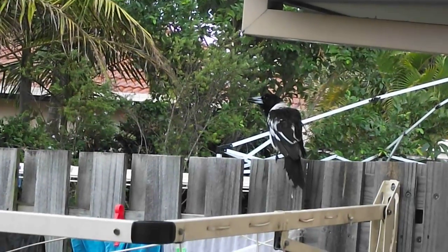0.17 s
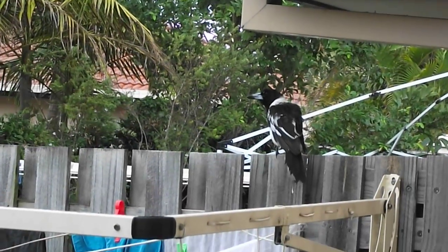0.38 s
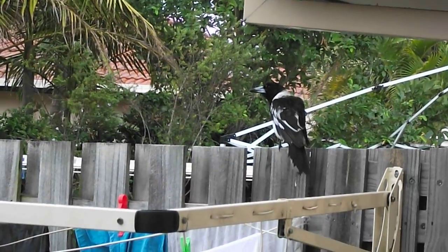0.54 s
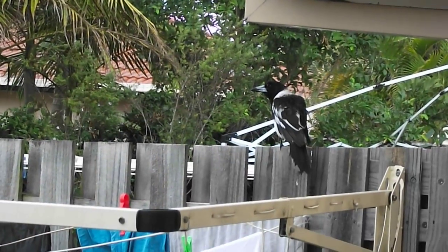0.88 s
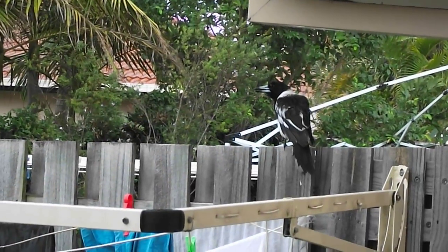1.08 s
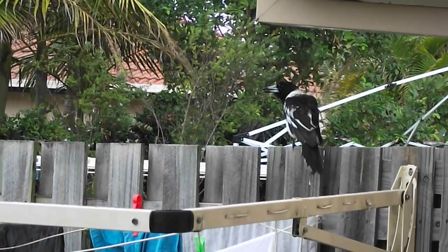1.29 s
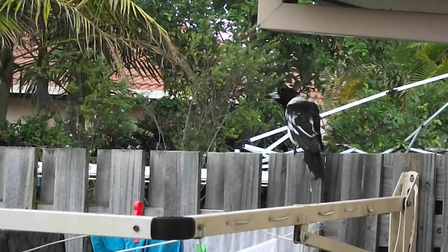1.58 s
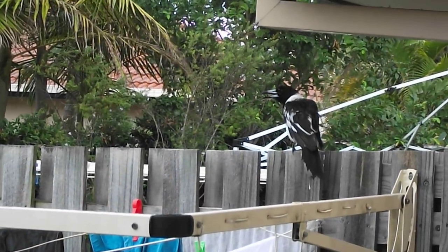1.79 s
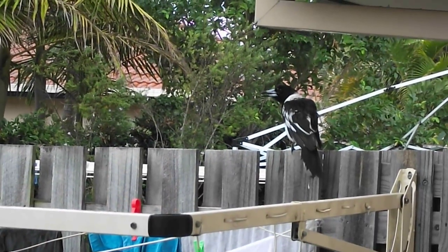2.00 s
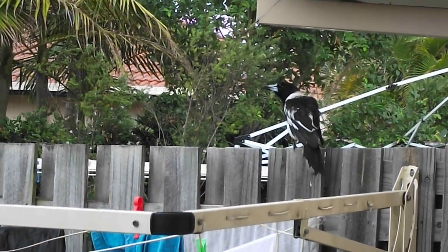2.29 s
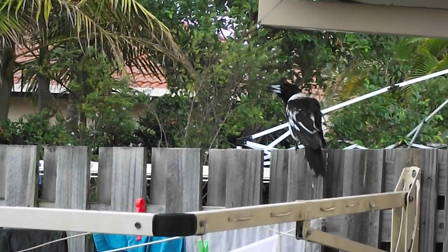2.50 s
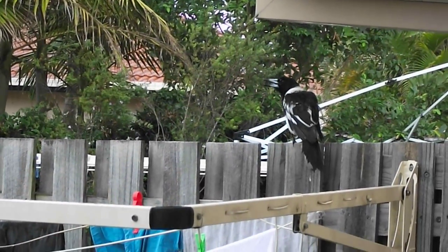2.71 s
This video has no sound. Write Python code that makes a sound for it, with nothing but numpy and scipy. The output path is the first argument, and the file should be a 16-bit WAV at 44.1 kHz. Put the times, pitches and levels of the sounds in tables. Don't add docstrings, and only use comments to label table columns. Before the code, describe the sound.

A bird sings a wavering low whistle, then pairs of higher chirpy calls over soft yard hiss

```python
import sys
import numpy as np
from scipy import signal
from scipy.io import wavfile
from scipy.ndimage import uniform_filter1d

SR = 44100
rng = np.random.default_rng(int(sys.argv[2]) if len(sys.argv) > 2 else 0)


def gain_from_db(level_db):
    decades = np.asarray(level_db, float) / 20
    return 10 ** decades


def master(y):
    cut = np.clip(np.atleast_2d(y).T, -1, 1)
    pcm = np.round(cut * 32767)
    wavfile.write(sys.argv[1], SR, pcm.astype(np.int16))


N = 125685


def evened(x):
    return x / np.sqrt(np.mean(x ** 2) + 1e-20)


def slow(count, hz):
    return evened(signal.lfilter(*signal.butter(2, hz, fs=SR), rng.standard_normal(count)))


def tone(hz, wobble_hz, wobble_rate_hz=4.1):
    cycles = np.cumsum(hz + wobble_hz * slow(N, wobble_rate_hz)) / SR
    return np.sqrt(2) * np.sin(2 * np.pi * (cycles + rng.random()))


def hiss(shape, patchy_db, low_hz, spectra):
    bin_hz = np.fft.rfftfreq(1024, 1 / SR)
    patches = uniform_filter1d(uniform_filter1d(spectra.real, size=12, axis=0), size=10, axis=1)
    shape_hz, shape_db = np.transpose(shape)
    colour = gain_from_db(np.interp(np.log(bin_hz + 1), np.log(shape_hz + 1), shape_db)) * (bin_hz > low_hz)
    shaped = spectra * colour[:, None] * gain_from_db(patchy_db * evened(patches))
    return evened(signal.istft(shaped, nperseg=1024, noverlap=768)[1][:N])


def yard_air():
    # (frequency [Hz], density [dB per Hz])
    middle_shape = [(12, -42), (20, 8), (58, -13), (93, -5.5), (120, -7.5), (367, -13.5), (873, -18),
                    (3530, -27), (16000, -51.5)]
    wide_shape = [(300, -7), (1800, -29), (2600, -9), (5000, 0), (7300, -13), (12000, -11.5), (15800, -9.5)]
    a, b = rng.standard_normal((N // 256 + 5, 513, 2)).T
    spectra = a + 1j * b
    middle = gain_from_db(-41.5) * hiss(middle_shape, 0.51, 12, spectra)
    wide = gain_from_db(-59.5) * hiss(wide_shape, 1.2, 400, -1j * spectra)
    return middle, wide


def machines(t):
    # (time [s], frequency [Hz], level [dB])
    drone = [(0, 87.4, -46), (.5, 87.54, -44.5), (1.4, 91.5, -45.5), (2.85, 92, -54)]
    s, hz, db = np.transpose(drone)
    steady = gain_from_db(-47.5 + slow(N, 0.49)) * tone(100.5, 0.52)
    speeding = gain_from_db(np.interp(t, s, db) + 1.06 * slow(N, 6.8)) * tone(np.interp(t, s, hz), 0.95)
    return steady + speeding


def camera_whines(mono):
    # (frequency [Hz], stereo-part level [dB], mono-part level [dB])
    whines = [(6792, -73, -72), (9572, -88, -84), (13587, -73, -68.5)]
    middle = np.zeros(N)
    for whine_hz, wide_db, mono_db in whines:
        level_db = wide_db + mono * (mono_db - wide_db)
        middle += gain_from_db(level_db) * tone(whine_hz, 9.3, 40)
    return middle, gain_from_db(-67) * tone(whines[-1][0], 8.1, 40)


def drips():
    # (time [s], peak level [dB], ring frequency [Hz], decay length [s])
    drops = [(0.0486, -41, 6050, 0.0021), (.0495, -35.5, 3770, 0.0013), (.05, -41.5, 2240, 0.014),
             (0.358, -54, 6200, 0.035), (0.533, -48, 5700, 0.005), (1.258, -40, 1060, 0.014),
             (1.435, -52, 4800, .006), (1.441, -46, 4650, .005), (1.459, -45, 4680, 0.011),
             (1.475, -47, 4460, 0.013), (1.627, -45, 5740, .002), (1.979, -42.5, 3600, 0.011),
             (1.98, -45, 2900, 0.011), (2.061, -42, 5160, .004), (2.378, -47, 6000, 0.0073),
             (2.379, -47, 6500, .008), (2.4, -44, 4200, 0.0072), (2.717, -44, 6360, 0.0016)]
    out = np.zeros(N + 2000)
    t = np.arange(2000) / SR
    for s, db, hz, length_s in drops:
        band = signal.butter(2, [hz * 0.885, hz * 1.08], "band", fs=SR)
        ring = evened(signal.lfilter(*band, rng.standard_normal(2000)))
        out[round(s * SR):][:2000] += gain_from_db(db) * ring * np.minimum(t / 0.00037, 1) * np.exp(-t / length_s)
    return out[:N]


def yard(x, echo_db):
    # (delay [s], lift over the scatter [dB])
    walls = [
        (.036, 10),
        (.084, 12),
    ]
    t60_s, fence_s, fence_share = .25, .084, .3
    t = np.arange(SR // 3) / SR
    lift_db = sum(db * np.exp(-((t - s) / .003) ** 2) for s, db in walls)
    sparse = rng.standard_normal(len(t)) * (rng.random(len(t)) < .05)
    scatter = sparse * gain_from_db(lift_db - 60 * t / t60_s) * (t > .012)
    fence = fence_share * (np.arange(len(t)) == round(fence_s * SR))
    taps = scatter / np.linalg.norm(scatter) + fence
    return signal.fftconvolve(x, gain_from_db(echo_db) * taps)[:len(x)]


def throb(t):
    # (first crest [s], end [s], throb rate [Hz], depth [dB])
    throbs = [
        (.076, .15, 51.5, 0.5),
        (.162, .2, 128, 3),
        (0.216, .31, 84.6, 5.5),
        (1.045, 1.075, 80, 6.5),
        (2.501, 2.56, 61, 5.5),
        (2.728, 2.76, 110, 3),
        (2.771, 2.83, 46, 3),
    ]
    ripple_db = 0
    for start, end, hz, db in throbs:
        fade = np.clip(np.minimum(t - start, end - t) / 0.0036, 0, 1)
        ripple_db = ripple_db + db * fade * np.cos(2 * np.pi * hz * (t - start))
    return ripple_db


def call(curve, voice):
    throat_hz, below_hz, above_hz, top_hz, third_db, flutter_db, echo_db = voice
    s, hz, db, step_db, *upper_db = np.transpose(curve)
    first = round(s[0] * SR)
    t = np.arange(first, first + SR) / SR
    pitch_hz = uniform_filter1d(uniform_filter1d(np.interp(t, s, hz), size=220), size=220)
    k = np.arange(1, 5)[:, None]
    harmonic_hz = k * pitch_hz

    upper = third_db + sum(np.interp(t, s, u) for u in upper_db)
    folds_db = np.interp(t, s, step_db) * np.minimum(k - 1, 1) + upper * (k > 2)
    width_hz = np.where(harmonic_hz < throat_hz, below_hz, above_hz)
    throat = 1 / (1 + (2 * (harmonic_hz - throat_hz) / width_hz) ** 2) ** 1.5
    size = gain_from_db(folds_db) * throat / (1 + (harmonic_hz / top_hz) ** 14)
    size = size / np.sqrt((size ** 2).sum(0) / 2)
    weak = 1 - size ** 2 / 2
    shimmer_db = 1.8 * weak * np.array([slow(SR, 29) for _ in k])
    size = size * gain_from_db(shimmer_db)

    flutter = flutter_db * 2 * np.tanh(slow(SR, 80) / 2)
    effort_db = uniform_filter1d(np.interp(t, s, db), size=130) + throb(t) + flutter
    edge = np.clip(np.minimum(t - s[0], s[-1] - t) / 0.0024, 0, 1)
    waves = np.sin(2 * np.pi * k * np.cumsum(pitch_hz) / SR)
    direct = edge * gain_from_db(effort_db) * (size * waves).sum(0)
    spilled = direct * gain_from_db(-0.88 * np.maximum(effort_db + 30, 0))
    return np.pad(direct + yard(spilled, echo_db), (first, N))[:N]


def birds():
    # (throat [Hz], width below [Hz], width above [Hz], top [Hz], upper overtones [dB],
    #          flutter [dB], yard echo [dB])
    low = (1200, 2000, 2000, 4000, -20, 2.4, -4)
    piping = (3000, 2500, 2502, 7500, -20, 1.8, -8.5)
    chirpy = (2600, 3400, 3000, 5200, 0, 1.5, -6)
    clear = (2600, 3500, 3000, 4500, -20, .3, -11)
    reedy = (4300, 4800, 2500, 5600, 0, 1.8, -12)
    # (time [s], pitch [Hz], effort [dB], step of all overtones [dB]), perhaps also upper overtones step
    # [dB]; the low whistle rises, then falls wavering
    waver = [(.017, 870, -32.5, -43), (.023, 904, -35, -43), (.042, 957, -44, -28),
             (.064, 1228, -31.5, -36), (.076, 1248, -27.5, -26), (.088, 1369, -35, -28),
             (.112, 1473, -28.5, -30), (.135, 1488, -31.5, -30), (.155, 1402, -30.5, -30),
             (.163, 1312, -23, -29), (.18, 1198, -39.5, -30), (.2, 1097, -25.5, -25),
                  (0.213, 991, -48, -30), (0.229, 929, -34.5, -43), (0.26, 727, -33.5, -35),
                  (0.277, 789, -55, -32), (0.295, 955, -41, -30), (0.341, 1003, -44.5, -30)]
    chirp_a = [(.963, 984, -43, 6, -23), (.974, 1173, -33, 9, -14), (.994, 1553, -41, 2, 8),
               (1.015, 1748, -44.5, 5, -16), (1.028, 2586, -34.5, -14, -20), (1.042, 3123, -34.5, -10, -20),
               (1.057, 2453, -26.5, -5, -20), (1.068, 2150, -40.5, -2, -20), (1.095, 2090, -53, -1, -20)]
    chirp_b = [(1.195, 1285, -56, 3), (1.216, 1712, -49.5, -2), (1.24, 1747, -48.5, 3),
               (1.249, 2250, -40, -18), (1.258, 3040, -45.5, -13), (1.274, 2280, -20, -36),
               (1.295, 2209, -19.5, -42), (1.311, 2230, -27, -40), (1.322, 2310, -49, -42)]
    reedy_a = [(1.681, 1144, -52, 10, -22), (1.692, 1445, -44, -9, -8), (1.71, 1602, -46, -2, -3),
               (1.74, 1460, -39.5, 0, 7.5), (1.778, 1570, -45, -9, 2), (1.81, 1778, -44.5, -3.5, 3),
               (1.85, 2126, -32.5, 2, -19), (1.862, 1980, -43, -1, -10), (1.873, 1730, -42, -13, -10)]
    reedy_b = [(2.016, 1190, -44, 8, -13), (2.033, 1530, -51.5, 3, 3), (2.099, 1592, -43.5, -12.5, 5),
               (2.121, 1708, -46, 1, -10), (2.141, 1754, -43, -13, 1), (2.161, 1943, -39, 7, -14),
               (2.181, 2064, -36.5, -4, -11), (2.2, 2080, -40, -12, -14), (2.215, 1860, -67, -4, -14)]
    pipe_a = [(2.36, 2932, -61, -10), (2.385, 3086, -41, 1), (2.408, 3220, -37, 15), (2.427, 3120, -28, 1),
              (2.442, 3043, -42, -13), (2.455, 2784, -32, -20), (2.488, 2707, -26.5, -15),
              (2.51, 2696, -28, -28), (2.545, 2643, -63, -30)]
    pipe_b = [(2.647, 2940, -61, -10), (2.668, 2907, -40, -6), (2.68, 3133, -39, 2),
              (2.703, 3283, -40.5, 16), (2.718, 3200, -31.5, -2), (2.73, 2930, -34.5, -10),
              (2.755, 2840, -39, -25), (2.795, 2863, -33.5, -30), (2.827, 2940, -46.5, -30)]
    far_a = [
        (.86, 2750, -56, -30),
        (.89, 2880, -54, -30),
        (.93, 2840, -60, -30),
    ]
    far_b = [
        (1.92, 2480, -66, -30),
        (1.945, 2580, -57, -30),
        (1.965, 2650, -62, -30),
    ]
    songs = [(far_a, piping), (far_b, piping), (waver, low),
             (chirp_a, chirpy), (chirp_b, clear), (reedy_a, reedy), (reedy_b, reedy),
             (pipe_a, piping), (pipe_b, piping)]
    return np.sum([call(*song) for song in songs], axis=0)


def scene():
    mono_s, fold_db, bird_side_db = 0.99, 2, -7.5
    t = np.arange(N) / SR
    mono = np.clip((t - mono_s) / 0.0099, 0, 1)
    air, wide = yard_air()
    whine_mid, whine_side = camera_whines(mono)
    tick = drips()
    bird = birds()
    mid = air + machines(t) + whine_mid + tick + bird + mono * gain_from_db(fold_db) * wide
    side = wide + whine_side - gain_from_db(bird_side_db) * np.gradient(bird + tick)
    return np.array([mid + (1 - mono) * side, mid - (1 - mono) * side])


def low_pass(x):
    return signal.sosfilt(signal.butter(12, 16900, fs=SR, output="sos"), x)


def record(dry):
    slip_s, skipped, edge_hz, offset = 2.4884, 8, 15790, -.0086
    at = round(slip_s * SR)
    step = dry[0, at + skipped:at + skipped + 9] - dry[0, at - 1:at + 8]
    at += np.argmin(abs(step)) - 1
    slipped = np.concatenate([dry[:, :at], dry[:, at + skipped:], dry[:, -skipped:]], axis=1)
    lowpass = signal.firwin(1023, edge_hz, window=("kaiser", 10), fs=SR)
    limited = signal.oaconvolve(slipped, lowpass[None], "same", axes=1)
    return low_pass(limited + offset)


dry = scene()
out = record(dry)
master(out)
```